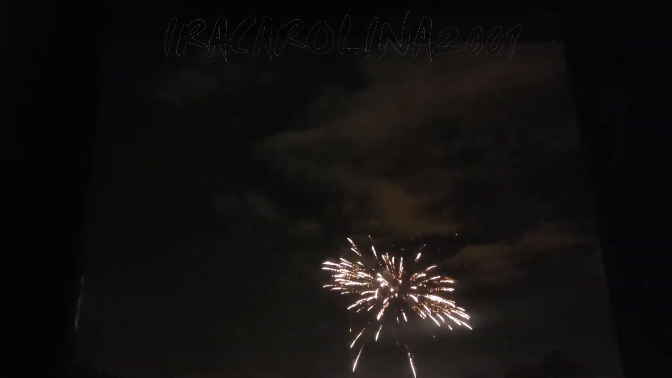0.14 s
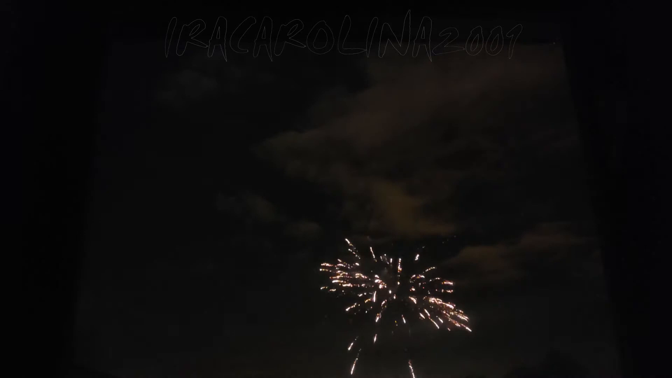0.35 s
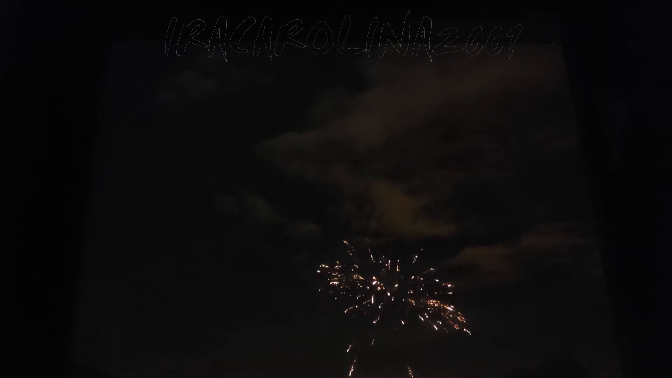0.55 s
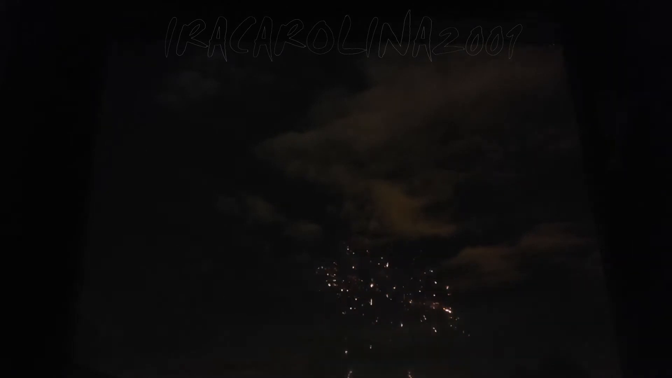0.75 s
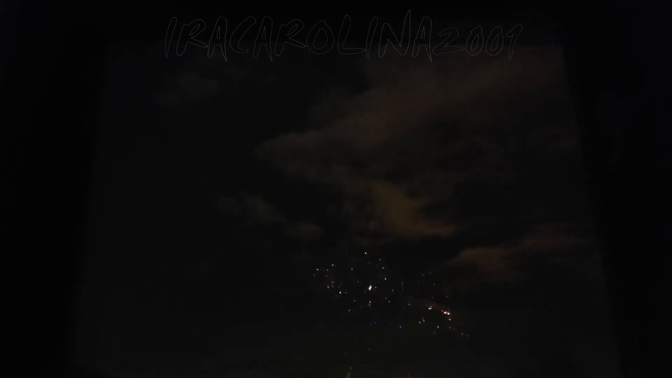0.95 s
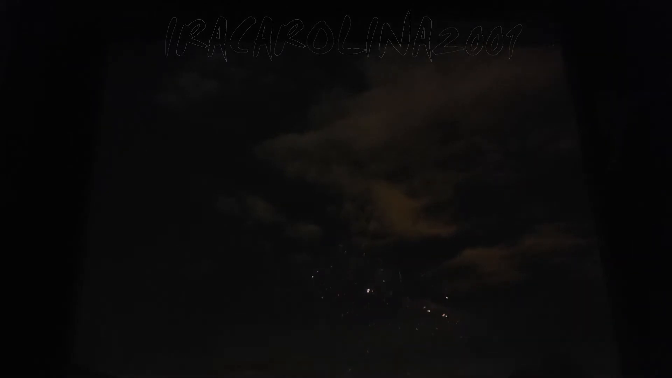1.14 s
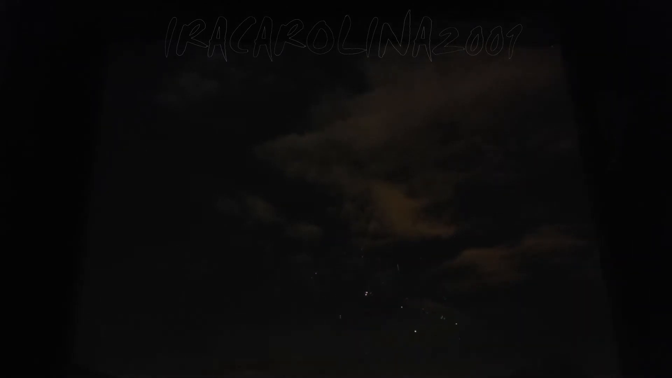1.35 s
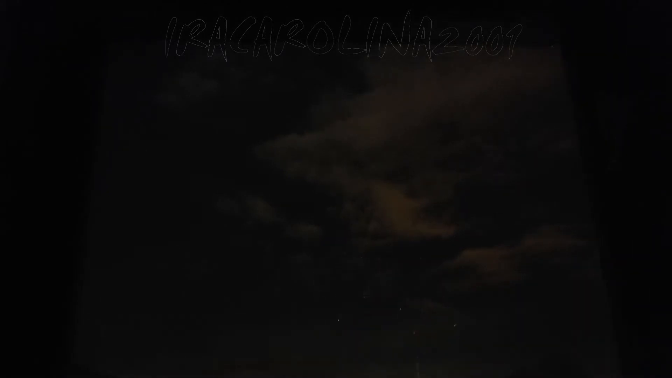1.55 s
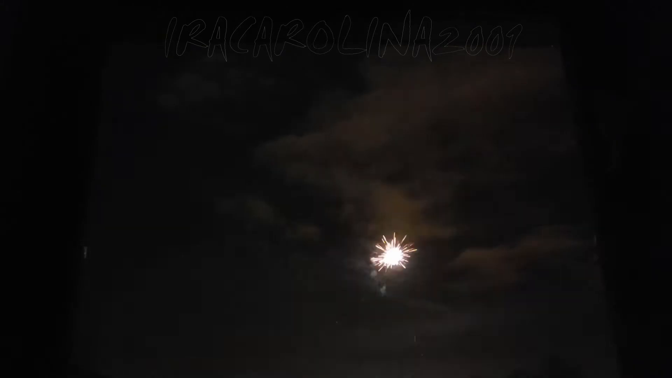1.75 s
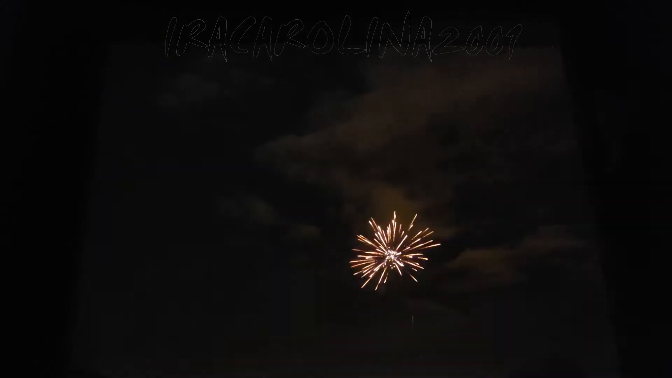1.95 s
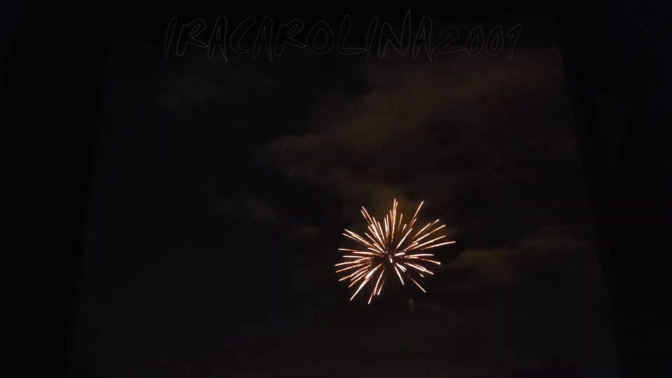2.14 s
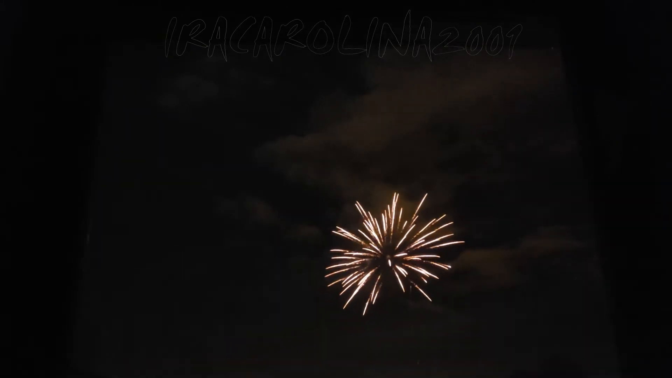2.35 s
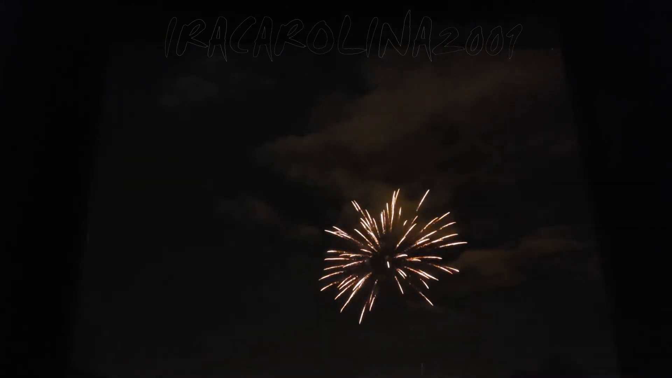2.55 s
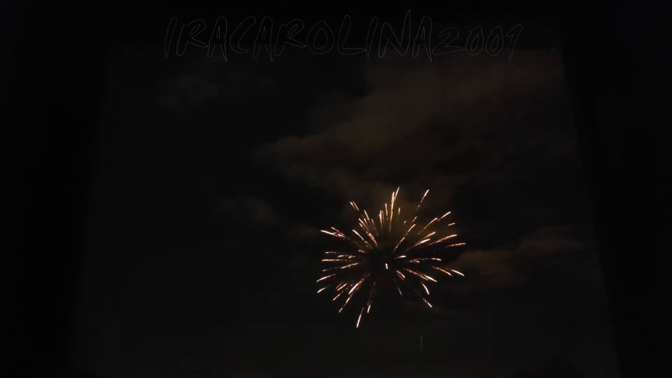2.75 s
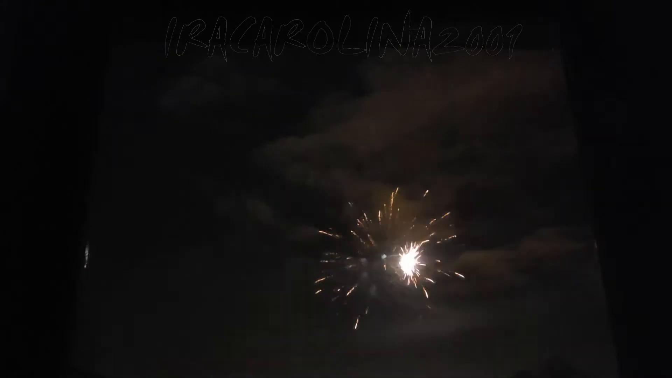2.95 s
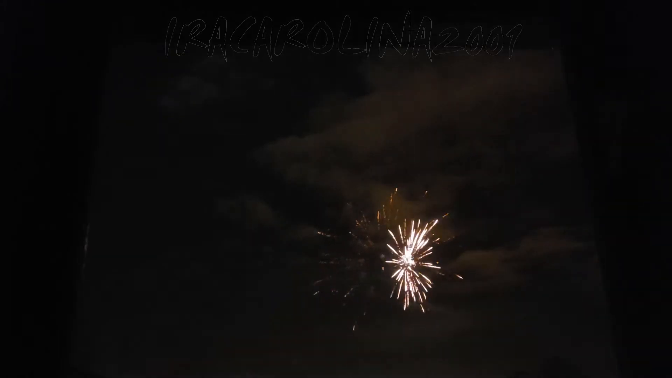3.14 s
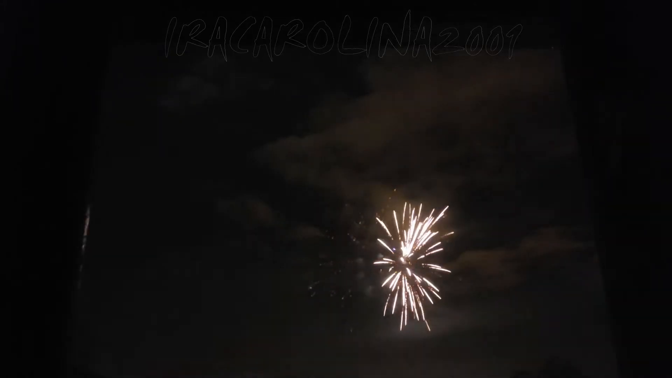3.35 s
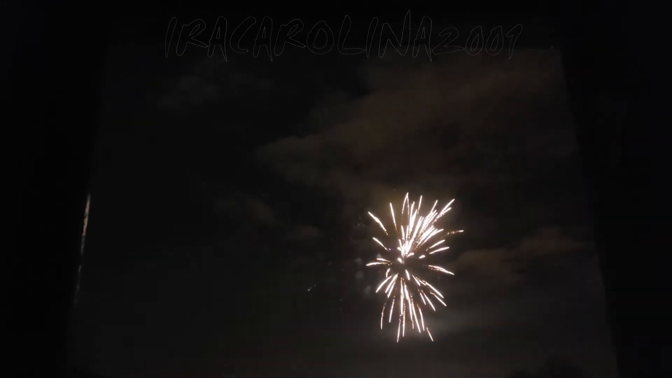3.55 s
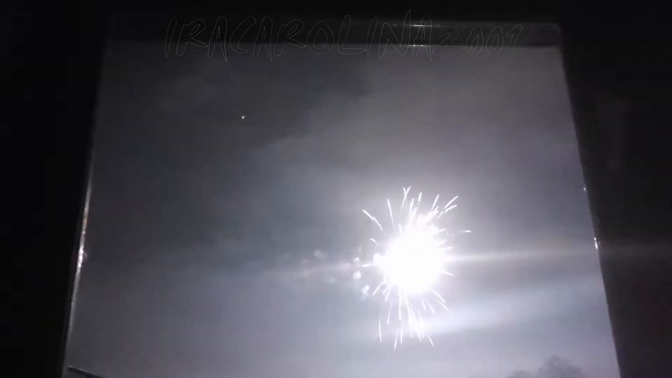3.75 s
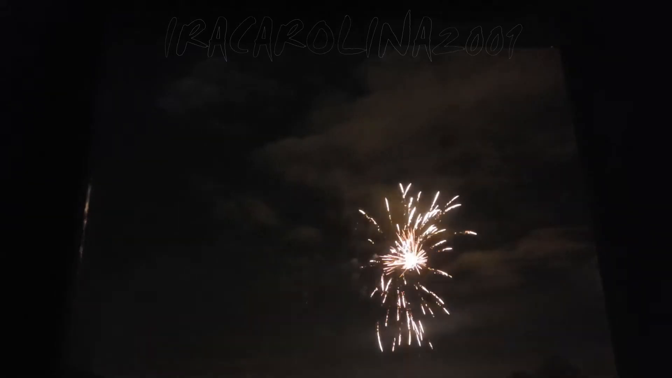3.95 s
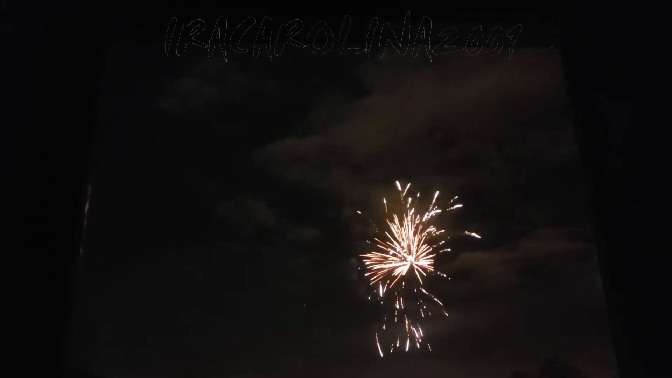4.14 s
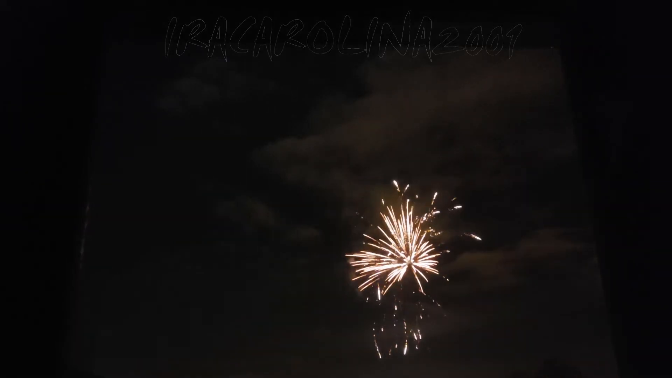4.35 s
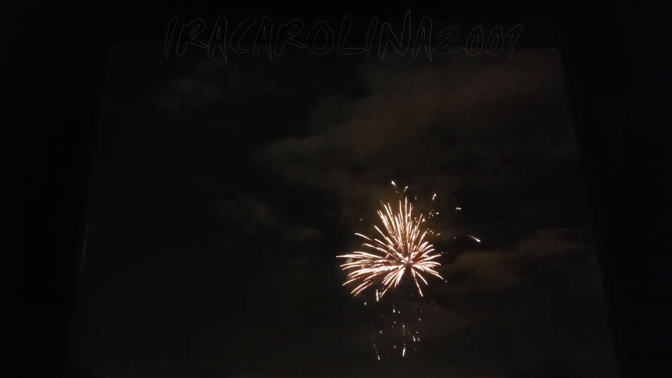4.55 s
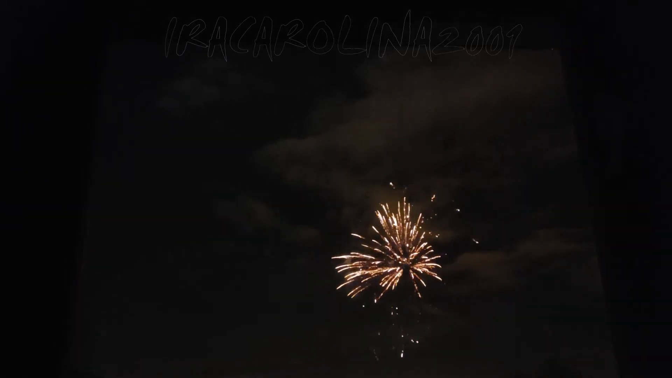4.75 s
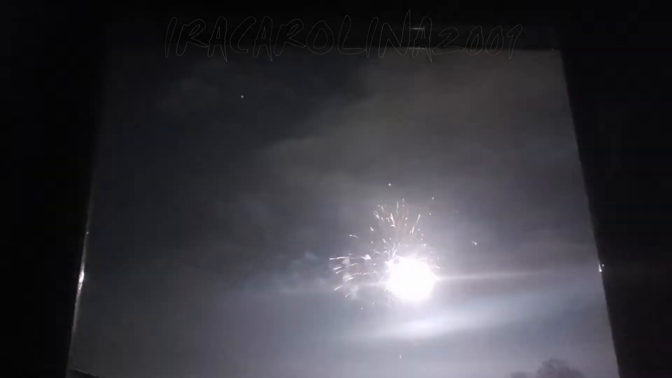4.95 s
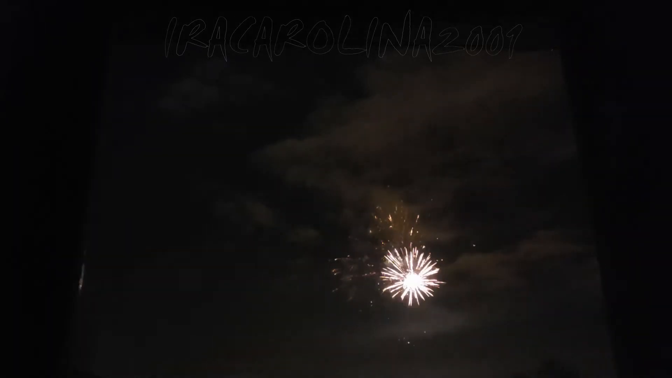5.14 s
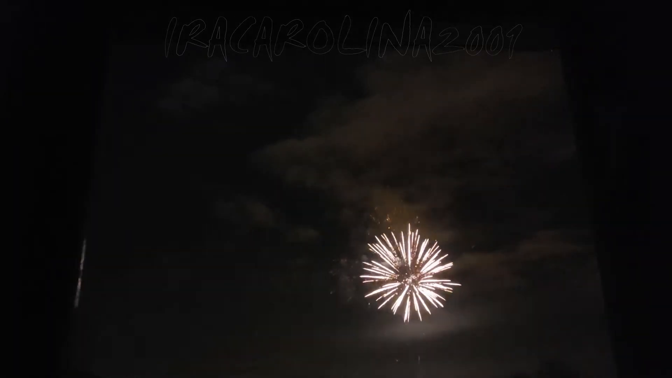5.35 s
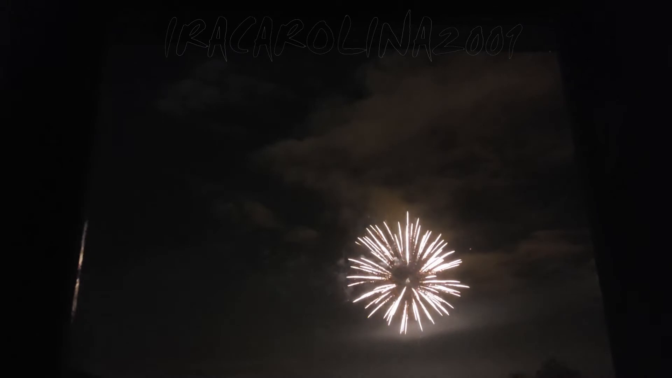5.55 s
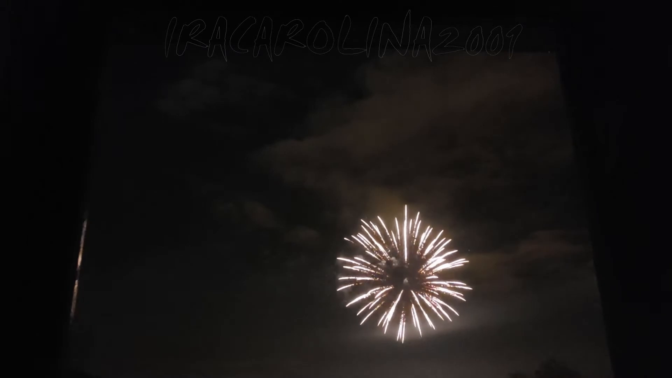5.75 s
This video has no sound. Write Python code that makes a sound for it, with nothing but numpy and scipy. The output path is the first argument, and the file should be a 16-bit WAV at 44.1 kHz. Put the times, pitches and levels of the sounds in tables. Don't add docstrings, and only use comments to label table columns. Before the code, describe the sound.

Quiet low hiss, soft launch thumps and tiny window-frame squeaks lead into four muffled firework blasts, the first weakest and the last strongest. Each hits as a blunt thud with a slight crack, then a grainy rumbling roll and distant echo. Small ticks and a brief level stumble come before the last boom. Mono, indoor perspective, with little treble.

```python
import sys
import numpy as np
from scipy import signal
from scipy.fft import rfft, irfft, next_fast_len
from scipy.io import wavfile
from scipy.ndimage import uniform_filter1d

SR = 44100
rng = np.random.default_rng(int(sys.argv[2]) if len(sys.argv) > 2 else 0)


def volts_from_decibels(level):
    exponent = np.asarray(level, float) / 20
    return 10 ** exponent


def output_pcm(signal):
    pcm = np.clip(np.atleast_2d(signal).T, -1, 1) * 32767
    wavfile.write(sys.argv[1], SR, np.round(pcm).astype(np.int16))


N = 259308
STEP = 16


def rms_one(x):
    return x / np.sqrt(np.mean(x ** 2) + 1e-20)


def butterworth(x, order, hz, kind="low"):
    return signal.sosfilt(signal.butter(order, hz, kind, fs=SR, output="sos"), x)


def coloured(x, points, peaks=()):
    size = 16384
    hz = np.maximum(np.arange(size // 2 + 1) * SR / size, 1)
    points_hz, points_db = np.array(points).T
    db = np.interp(np.log(hz), np.log(points_hz), points_db)
    for centre_hz, width_hz, lift_db in peaks:
        db = db + lift_db / (1 + (2 * (hz - centre_hz) / width_hz) ** 2)
    cepstrum = irfft(np.log(volts_from_decibels(db)))
    cepstrum[1:size // 2] *= 2
    cepstrum[size // 2 + 1:] = 0
    pulse = irfft(np.exp(rfft(cepstrum)))
    return signal.fftconvolve(x, pulse / np.sqrt(np.sum(pulse ** 2)))[:N]


def resonate(x, hz, width_hz):
    r = np.exp(-np.pi * width_hz / SR)
    return signal.lfilter([1, 0, -1], [1, -2 * r * np.cos(2 * np.pi * hz / SR), r * r], x + 1e-18)


def wavering(hz, width_hz):
    ring = resonate(resonate(rng.standard_normal(N), hz, width_hz), hz, 3.9 * width_hz)
    ring = signal.hilbert(ring, next_fast_len(N))[:N]
    return rms_one(np.real(ring / (np.abs(ring) + 1e-9) ** 0.7))


def patchy(spread_db):
    frames = signal.stft(rng.standard_normal(N), nperseg=512)[2]
    across_bands = uniform_filter1d(rng.standard_normal(frames.shape), size=3, axis=0)
    clumps = uniform_filter1d(across_bands, size=6, axis=1)
    return rms_one(signal.istft(frames * volts_from_decibels(spread_db * rms_one(clumps)), nperseg=512)[1][:N])


def build_up(rise_s):
    t, gain = np.arange(N) / SR, np.ones(N)
    for s, *_ in SHELLS:
        gain = np.where(t >= s, 1 - np.exp(-((t - s) / rise_s) ** 2), gain)
    return gain


def swell(s, rise_s, level_db, hold_s, sag, fall):
    t = np.arange(0, N, STEP) / SR - s
    climb_db = 30 * np.minimum(t, 0) / rise_s
    sag_db = sag * np.clip(t, 0, hold_s)
    fall_db = fall * np.maximum(t - hold_s, 0)
    return volts_from_decibels(2 * (level_db + climb_db - sag_db - fall_db))


# (frequency [Hz], level [dB])
HISS_SPECTRUM = [(15, -52), (25, -43.5), (80, -2.5), (127, -14), (162, -1), (270, -1), (304, -2),
                 (379, -6.5), (572, -11.5), (615, -17.5), (747, -12), (2120, -30.5), (2640, -27),
                 (3280, -32), (8260, -40), (10700, -75), (18200, -120)]


def hiss():
    return volts_from_decibels(-64) * coloured(rng.standard_normal(N), HISS_SPECTRUM)


# (near houses [dB], far slope [dB],
# bass share of slope [dB], pane hum [dB], hum hold [s])
SHELL_ROLLS = [(-22, -46, 8.5, -39, 0.708), (-22.5, -46, -6, -40, 0.23), (-24, -45, 2.5, -37.5, 0.36),
               (-23, -48.5, -14, -38, 0.48), (-22, -41, 0, -41, 0.35)]
# (near top [dB], slope's top [dB], murmur [dB], lingering hum [dB], slope delay [s])
SHELL_SHADES = [(5.8, 1.5, -2.3, -2, -0.024), (-2, 0.5, -2, -10.5, 0.001), (-0.2, 1, 2.5, 2, -0.013),
                (0, 1, 1.2, -9, -0.0087), (-0.5, -5.5, 4, -1.5, -0.036)]
# (near offset [dB], near fall [dB/s], slope offset [dB], slope fall [dB/s], murmur [dB])
ROLL_LAYERS = [
    (-0.5, 60.5, -0.5, 107, -66),
    (-3, 52, -4, 65, -69),
    (-24, 81.5, -23, 48, -76),
]
# (time [s], roll level [dB], bass level [dB], pane hum level [dB], fall [dB/s])
FAR_BURSTS = [(.13, -68, -36.5, -40, 96), (0.498, -59.5, -66.5, -54.5, 64), (.72, -69, -72, -55.5, 93),
              (.87, -59.5, -75, -54, 200), (0.978, -69, -52.5, -55, 152), (1.1, -64, -57, -60, 142),
              (1.32, -71, -61, -60.5, 52), (1.548, -77, -58, -51, 100), (1.66, -60.5, -57, -63.5, 100.5),
              (1.791, -63, -73, -78, 202), (1.96, -74, -67, -65.5, 149), (2.42, -33.5, -40.5, -38.5, 199.5),
              (2.641, -44, -44, -47, 150), (2.8, -53, -73, -55.5, 109), (3.335, -76, -67, -49.5, 150),
              (3.53, -27.5, -31.5, -35, 200.5), (4.1, -59.5, -57, -61.5, 150),
              (4.199, -67, -69, -48.5, 148.5), (4.86, -47.5, -57.5, -69, 102), (5.12, -64, -65, -57, 153),
              (5.22, -66, -70, -59, 203), (5.38, -74, -69, -68, 143)]
EARLIER_S = -0.36
GATHER_S, GATHER_DB, GATHER_HOLD_S = 0.039, -9, 0.028
SLOPE_S, SLOPE_RISE_S, SLOPE_HOLD_S, SLOPE_SAG = 0.38, 0.033, 0.24, 29.4
MURMUR_FALL = 5
HUM_SAG, HUM_FALL, HUM_REST_DB = 7.9, 270, -60
LEAD_S, LEAD_DB = 0.014, -58


def levels():
    t = np.arange(0, N, STEP) / SR
    power = np.zeros((4, len(t)))
    times = [EARLIER_S] + [s for s, *_ in SHELLS]
    for s, decay, shade in zip(times, SHELL_ROLLS, SHELL_SHADES):
        near_db, slope_db, bass_db, hum_db, hum_hold_s = decay
        top_db, slope_top_db, rest_db, hum_rest_db, late_s = shade
        since, on = np.maximum(t - s, 0), t >= s
        gather_db = GATHER_DB * np.maximum(1 - since / GATHER_S, 0)
        near_shares, slope_shares = (0, 0, top_db), (0, bass_db, slope_top_db)
        for k, own_db, share_db, layer in zip((0, 1, 3), near_shares, slope_shares, ROLL_LAYERS):
            db, fall, far_db, far_fall, murmur_db = layer
            near = near_db + db + own_db + gather_db - fall * np.maximum(since - GATHER_HOLD_S, 0)
            murmur = murmur_db + rest_db - MURMUR_FALL * since
            slope = swell(s + SLOPE_S + late_s, SLOPE_RISE_S, slope_db + far_db + share_db,
                          SLOPE_HOLD_S, SLOPE_SAG, far_fall)
            power[k] += on * (volts_from_decibels(2 * near) + volts_from_decibels(2 * murmur) + slope)
        hum_rest = HUM_REST_DB + hum_rest_db - MURMUR_FALL * since
        power[2] += on * (swell(s, 1, hum_db, hum_hold_s, HUM_SAG, HUM_FALL) + volts_from_decibels(2 * hum_rest))
        power += ~on * swell(s, 5 * LEAD_S, LEAD_DB, 0, 0, 0) * volts_from_decibels([[0], [6], [6], [-30]])
    for s, *dbs, fall in FAR_BURSTS:
        power[:3] += swell(s, 0.045, np.array(dbs)[:, None], 0, 0, fall)
    return np.repeat(np.sqrt(power), STEP, axis=1)[:, :N]


def echoes(per_s, uneven_db, likeness):
    marks = (rng.random((2, N)) < per_s / SR) * rng.choice([-1, 1], (2, N))
    houses, fresh = marks * volts_from_decibels(uneven_db * np.minimum(rng.exponential(1, (2, N)), 4))
    starts = [0] + [round(s * SR) for s, *_ in SHELLS] + [N]
    repeated = np.concatenate([houses[:b - a] for a, b in zip(starts, starts[1:])])
    likeness = np.clip(likeness, 0, 1)
    return rms_one(np.sqrt(likeness) * repeated + np.sqrt(1 - likeness) * fresh)


# (frequency [Hz], level [dB per Hz])
ROLL_SPECTRUM = [(100, -41), (175, -4.5), (188, -9), (227, 0.5), (380, -5), (440, -3.5), (515, 2),
                 (562, -5.5), (657, -7.5), (853, -21.5), (1400, -41), (1820, -75.5), (3080, -120)]
# (frequency [Hz], width [Hz], lift [dB])
ROOM_MODES = [(254.3, 18, 7), (292.9, 4.2, 12.5), (323.4, 7.8, 7), (350, 24, 4.5), (412.7, 11, 5),
              (445.1, 9.7, 10.5), (485.7, 8.8, 5), (524.3, 5.9, 10.5), (576, 4.9, 8.5), (579.4, 14, 3.5),
              (643, 22, 7), (706, 35, 1.5), (912.5, 27, 9.5), (953, 9.2, 2), (1210, 28, 14.5)]
# (frequency [Hz], level [dB per Hz])
LEAK_SPECTRUM = [(470, -20.5), (800, -11), (986, -8.5), (1110, -16), (1210, -18.5), (1540, -22),
                 (2210, -24.5), (2850, -18.5), (3330, -20.5), (3610, -26), (4330, -27.5), (7000, -49.5),
                 (9100, -100.5), (15400, -120)]
# (frequency [Hz], width [Hz], lift [dB])
SASH_GAPS = [(1480, 31, 6.5), (2400, 190, 3.5), (2608, 44, 6), (2796, 62, 9), (2990, 45, 4.5),
             (3210, 110, 1.5), (3320, 38, 3), (4220, 94, 6.5), (4930, 180, 5)]


def roll():
    upper, lower, hum, top = levels()
    answer = echoes(1100, 2.5, 0.56) * build_up(0.0068)
    high = butterworth(upper * answer, 4, 410, "high")
    low = butterworth(lower * answer, 4, 410)
    leak = coloured(top * (0.52 * answer + 1.326 * patchy(4.0)), LEAK_SPECTRUM, SASH_GAPS)
    body = coloured(volts_from_decibels(1.0) * high + low, ROLL_SPECTRUM, ROOM_MODES)
    pane = volts_from_decibels(1.0) * hum * build_up(0.019) * wavering(221, 7.3)
    return body + pane + volts_from_decibels(0.5) * leak


# (time [s], level [dB], hold [s], fall [dB/s])
LAUNCHES = [(.18, -72, .03, 95), (1.285, -50.5, 0.013, 147), (1.36, -53.5, 0.083, 300),
            (1.5, -59.5, 0.14, 250), (1.9, -73, .1, 51), (2.75, -69.5, 0.046, 81), (2.95, -76, 0.046, 65),
            (4.8, -55.5, 0.054, 202), (4.87, -54.5, .04, 203), (4.96, -60, 0.036, 200),
            (5.11, -64.5, 0.033, 152), (5.26, -70, .1, 63), (5.72, -64.5, 0.029, 83)]


def thumps():
    hits = LAUNCHES + [(s + 0.025, -64, 0, 24) for s, *_ in SHELLS]
    power = volts_from_decibels(2 * -85) + sum(swell(s, 0.027, db, hold_s, 0, fall) for s, db, hold_s, fall in hits)
    low = wavering(81, 12)
    overtone = rms_one(resonate(resonate(rng.standard_normal(N), 160, 30), 160, 60))
    return np.repeat(np.sqrt(power), STEP)[:N] * (low + volts_from_decibels(-8.0) * overtone)


# (time [s], length
# [s], frequency [Hz], level [dB])
FRAME_SQUEAKS = [(.95, .13, 488, -57.5), (.92, 0.22, 436, -64.5), (.25, 0.2, 320, -51.5),
                 (2.696, 0.046, 2420, -70), (3.7, 0.072, 1445, -80.5), (3.755, .125, 824, -53),
                 (4.001, .1, 2320, -79), (4.144, 0.11, 870, -74), (2.63, 0.074, 170, -55),
                 (4.65, 0.056, 2380, -69), (5.223, .08, 2075, -79.5)]


def squeaks():
    out = np.zeros(N)
    for s, length_s, hz, db in FRAME_SQUEAKS:
        at, count = round(s * SR), round(length_s * SR)
        ring = signal.hilbert(resonate(resonate(rng.standard_normal(20000), hz, 6.0), hz, 26))
        ring = ring[-count - 500:-500]
        tone = rms_one(np.real(ring / np.abs(ring) ** 0.47))
        out[at:at + count] += volts_from_decibels(db) * tone * np.hanning(count) ** 0.19
    return out


# (time [s], blast level [dB], crack level [dB])
SHELLS = [
    (2.1934, -21.5, -44.5),
    (3.3875, -19.5, -45),
    (4.3204, -19, -45.5),
    (5.5178, -18, -45),
]
# (delay [s], level [dB])
NEAR_WALLS = [(.0130, 0.5), (0.0175, 1.5), (0.0283, 0.5), (0.0303, 8), (0.0367, 1.5), (0.0451, -1.5),
              (.0510, 4), (.0678, 6.5), (0.075, -8.5), (0.0858, 3.5), (.0990, 1.5)]
# (frequency [Hz], level [dB])
BLAST_SPECTRUM = [(60, -41.5), (140, -10), (230, 2.5), (420, 4.5), (700, -13), (1200, -40.5), (3000, -51),
                  (9000, -79.5)]
# (frequency [Hz], level [dB per Hz])
CRACK_SPECTRUM = [(530, -18), (900, 3.5), (1340, -19.5), (1490, -10), (1660, -17), (2870, -13.5),
                  (3420, -11), (3580, -15.5), (5650, -18), (6140, -18), (6990, -30.5), (7740, -18.5),
                  (8260, -24), (10700, -66), (18200, -120)]
# (frequency [Hz], level [dB], decay time T60 [s])
FRAME_MODE = (161, -31, 0.8)


def blasts():
    t = np.arange(N) / SR
    direct, walls, crack = np.zeros(N), np.zeros(N), np.zeros(N)
    scatter = rng.standard_normal((len(SHELLS), len(NEAR_WALLS)))
    for (s, blast_db, crack_db), chances in zip(SHELLS, scatter):
        direct[round(s * SR)] = volts_from_decibels(blast_db)
        for (delay_s, wall_db), chance in zip(NEAR_WALLS, chances):
            walls[round((s + delay_s) * SR)] = volts_from_decibels(blast_db + wall_db + 3.3 * chance)
        crack += (t >= s) * volts_from_decibels(crack_db - 60 * np.maximum(t - s, 0) / 0.29)
    hz, level_db, t60_s = FRAME_MODE
    frame = np.sin(2 * np.pi * hz * t) * volts_from_decibels(level_db + 21 - 60 * t / t60_s) * (1 - np.exp(-t / 0.0055))
    head_on = volts_from_decibels(4.5) * butterworth(direct, 2, 330)
    arrivals = head_on + volts_from_decibels(-1.0) * direct / 4 + volts_from_decibels(-7.0) * walls
    pulses = volts_from_decibels(17.5) * coloured(arrivals, BLAST_SPECTRUM)
    ringing = signal.fftconvolve(direct, frame)[:N]
    return pulses + ringing + coloured(crack * patchy(3.8), CRACK_SPECTRUM, SASH_GAPS)


def scene():
    background = hiss()
    shells = butterworth(blasts() + roll(), 4, 70, "high")
    return (shells + thumps() + squeaks() + background)[None]


# (frequency [Hz], level [dB])
ROUNDING_STEPS = [(200, -57), (1500, -54), (3000, -50.5), (4500, -50.5), (6000, -50.5), (8000, -54)]


def thrifty(x):
    hz, _, frames = signal.stft(x, SR, "cosine", nperseg=2048)
    loudest = uniform_filter1d(np.abs(frames).max(axis=0), size=3) / volts_from_decibels(-42.5)
    steps_hz, steps_db = np.array(ROUNDING_STEPS).T
    below_db = np.interp(np.log(hz + 1), np.log(steps_hz), steps_db)
    ragged_db = 4.2 * np.repeat(rng.standard_normal((65, len(loudest))), 16, axis=0)[:len(hz)]
    follow = np.minimum(loudest ** 1.1, loudest ** 0.24)
    step = volts_from_decibels(below_db[:, None] + ragged_db - 41.0) * follow + 1e-12
    kept = np.round(frames / step * 0.88) * step / 0.94 * (hz < 8400)[:, None]
    return signal.istft(kept, SR, "cosine", nperseg=2048)[1][:N]


def top_band(x):
    flicker_db = 4 * np.repeat(rng.standard_normal(N // 1024 + 1), 1024)[:N]
    quiet = uniform_filter1d(x ** 2, size=4096) < volts_from_decibels(2 * (-50.5 + flicker_db))
    sliver = butterworth(patchy(3.0), 6, (10700, 12000), "band")
    return volts_from_decibels(-99) * rms_one(sliver) * uniform_filter1d(quiet * 1., size=512)


# (time [s], gain from then on [dB], tick level [dB])
LEVEL_JUMPS = [
    (4.8188, -0.5, -52),
    (4.8272, 3, -58.5),
    (4.8356, -3, -34.5),
    (4.8483, 0, -52.5),
]


def level_jumps():
    gain, ticks = np.ones(N), np.zeros(N)
    for s, gain_db, tick_db in LEVEL_JUMPS:
        at = round(s * SR)
        gain[at:] = volts_from_decibels(gain_db)
        ticks[N - 1 - at] = -volts_from_decibels(tick_db)
    ticks[-1] = volts_from_decibels(-29.5)
    return gain, signal.lfilter([1], [1, -0.96], ticks)[::-1]


def top_cut(x):
    return signal.sosfilt(signal.butter(12, 12300, fs=SR, output="sos"), x)


def record(dry):
    gain, ticks = level_jumps()
    mix = thrifty(dry[0]) * gain + ticks + top_band(dry[0])
    return top_cut(mix[None])


dry = scene()
out = record(dry)
output_pcm(out)
```